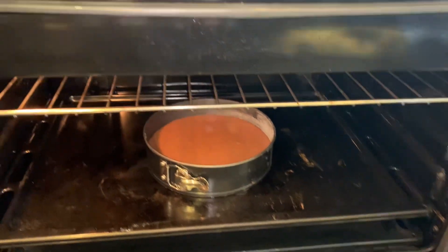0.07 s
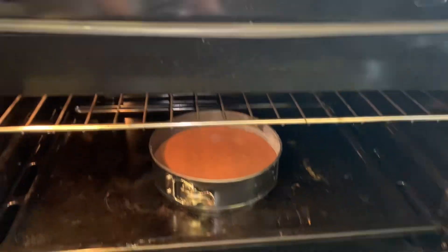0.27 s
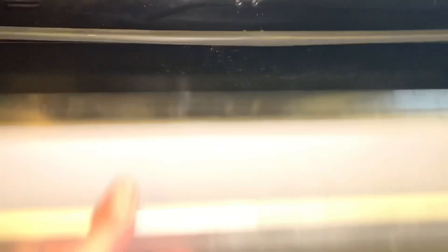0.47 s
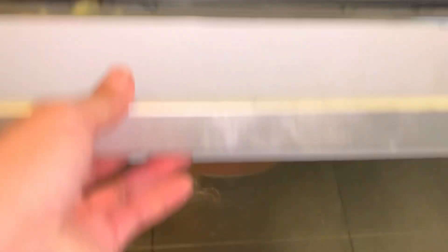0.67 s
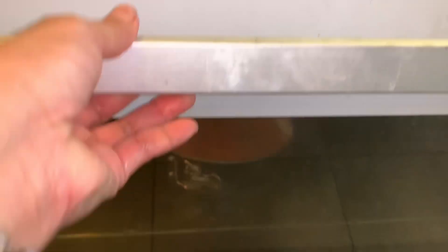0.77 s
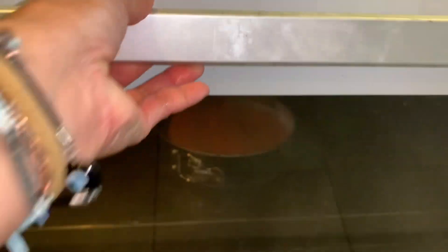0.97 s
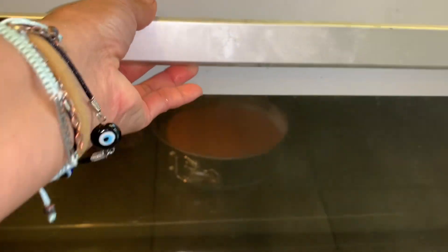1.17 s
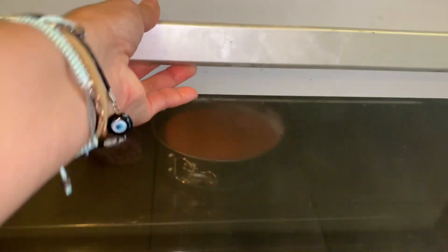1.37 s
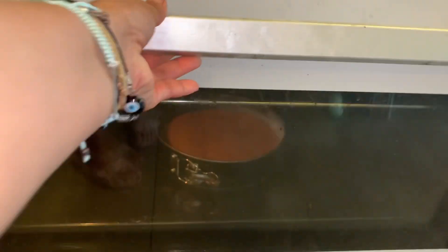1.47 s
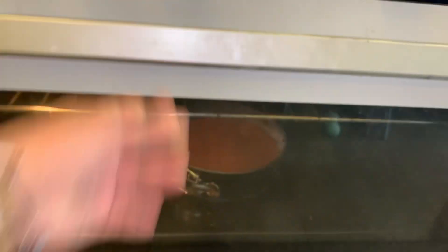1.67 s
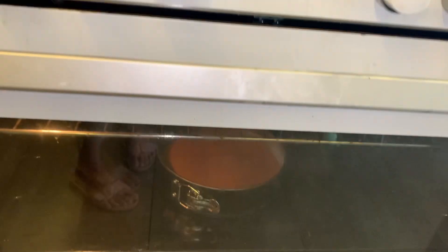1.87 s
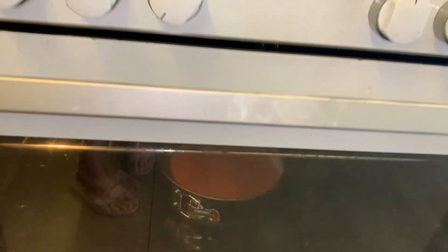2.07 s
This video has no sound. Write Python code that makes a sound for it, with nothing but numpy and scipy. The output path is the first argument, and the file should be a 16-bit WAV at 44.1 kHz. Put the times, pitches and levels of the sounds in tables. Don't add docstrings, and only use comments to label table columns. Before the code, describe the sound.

An oven door swings shut in a tiled kitchen, heard close on a phone in stereo: gritty juddering hinge rub with small squeaks, two bright taps on glass, then a catch snap and heavy thud with rattling racks.

```python
import sys
import numpy as np
from scipy import signal
from scipy.fft import rfft, irfft, next_fast_len
from scipy.io import wavfile
from scipy.ndimage import uniform_filter1d, map_coordinates

SR = 44100
rng = np.random.default_rng(int(sys.argv[2]) if len(sys.argv) > 2 else 0)


def transcribe(signal):
    frames = np.atleast_2d(signal).T
    limited = np.clip(frames, -1, 1)
    pcm = np.round(limited * 32767).astype(np.int16)
    wavfile.write(sys.argv[1], SR, pcm)


def boost_factor(decibels):
    exponent = np.asarray(decibels, float) / 20
    return 10 ** exponent


N = 92830
TIME = np.arange(N) / SR

# start_s, level_db, clatter_db, door_pitch_hz
LANDINGS = [
    (1.557, -9.5, 1, 76.3),
    (1.604, -14.5, -9.5, 97),
    (1.6548, -20.5, -11, 88),
    (1.716, -28, -4, 84),
    (1.755, -30.5, -9, 83),
    (1.805, -28, -3, 64.6),
    (1.904, -33.5, -15, 73.5),
]


def unit(x):
    return x / np.sqrt(np.mean(x ** 2) + 1e-20)


def along(points, hz):
    f, v = np.transpose(points)
    return np.interp(np.log(hz + 1), np.log(f + 1), v)


def curves(rows):
    s, *columns = np.transpose(rows)
    return [np.interp(TIME, s, column) for column in columns]


def wobble(rate):
    return map_coordinates(rng.standard_normal(N // 100), [TIME * rate])


def filtered(x, response):
    m = next_fast_len(N + SR // 2)
    return irfft(rfft(x, m) * response(np.fft.rfftfreq(m, 1 / SR)), m)[..., :N]


def noise(spectrum):
    return unit(filtered(rng.standard_normal((2, N)), lambda hz: boost_factor(along(spectrum, hz))))


def patchy(x):
    patch_db = 3
    z = signal.stft(x, nperseg=1024)[2]
    field = rng.standard_normal(z.shape[1:])
    field = uniform_filter1d(uniform_filter1d(field, size=4, axis=0), size=5, axis=1)
    return signal.istft(z * boost_factor(patch_db * unit(field)), nperseg=1024)[1][:, :N]


def swell(s, db, t60, rise_s):
    t = np.maximum(TIME - s, 0)
    return boost_factor(db - 60 * t / t60) * (1 - np.exp(-t / rise_s))


def ring(s, db, modes, rise_s, scatter):
    draw = rng.standard_normal((len(modes), 4))
    out = np.zeros((2, N))
    first = int(np.ceil(s * SR))
    for (hz, level, t60), u in zip(modes, draw):
        t = TIME[first:first + int(t60 * SR)] - s
        fall = boost_factor(db + level + 1.56 * u[0] - 60 * t / t60) * (1 - np.exp(-t / rise_s))
        phase = 2 * np.pi * hz * (1 + scatter * u[1]) * t
        out[:, first:first + len(t)] += fall * np.sin(phase + [[0], [u[2]]]) * [[1], [np.tanh(u[3])]]
    return out


def thump():
    # pitch_hz, level_db, t60_s
    cabinet_modes = [(56, -14, 0.42), (119.7, -7.5, 0.28), (163, -22, 0.18), (216.3, -17.5, 0.22)]
    # start_s, level_db, pitch_hz, t60_s
    knocks = [(1.578, -17.5, 129, 0.17), (1.615, -22, 134.6, 0.2), (1.645, -25, 122.4, 0.23),
              (1.59, -27, 207, .2), (1.592, -25, 351, 0.11), (1.67, -31, 286, 0.11),
              (1.715, -30, 151, 0.18), (1.74, -31, 143.4, .2), (1.79, -37.5, 307, 0.089),
              (1.822, -39, 216, 0.13)]
    rise_s, grip_s, door_t60_s = 0.005, .014, .5
    ends = [row[0] for row in LANDINGS[1:]] + [N / SR]
    boom = np.zeros(N)
    for (s, db, _, hz), end in zip(LANDINGS, ends):
        held = np.clip((end - TIME) / grip_s, 0, 1)
        boom += swell(s, db, door_t60_s, rise_s) * np.sin(2 * np.pi * hz * (TIME - s)) * held
    body = sum(ring(s, db, cabinet_modes, rise_s, scatter=0.038) for s, db, *_ in LANDINGS)
    panels = sum(ring(s, db, [(hz, 0, t60)], rise_s, scatter=0.0035) for s, db, hz, t60 in knocks)
    return -(body + boom * [[1], [.5]] + panels)


def clatter():
    # pitch_hz, level_db, t60_s
    sheet_modes = [(287.5, -15, 0.3), (392.8, 1, 0.13), (487, -12.5, 0.3), (733.6, 6.5, 0.14),
                   (818, -2.5, 0.11), (1080, -2.5, 0.13), (1267, -4.5, 0.12)]
    # frequency_hz, level_db
    rattle_spectrum = [(88, -40), (150, -11.5), (624, -17.5), (1000, -21), (4000, -34), (7000, -55),
                       (13000, -63), (16000, -59)]
    # start_s, level_db, t60_s
    settles = [
        (1.572, -36.5, 0.22),
        (1.62, -54, 0.11),
        (1.8028, -58, 0.048),
        (1.826, -56, 0.1),
        (1.834, -48, 0.24),
        (1.9504, -51, 0.061),
    ]
    # frequency_hz, level_db
    buzz_spectrum = [(3000, -28), (6500, 8.5), (9000, -5.5), (13000, -9), (16000, -22)]
    sheet_lag_s, sheet_db, rattle_db = .012, -11, -11
    sheet = sum(ring(s + sheet_lag_s, db + c + sheet_db, sheet_modes, 0.013, scatter=0.0066)
                for s, db, c, _ in LANDINGS)
    shake = sum(swell(s, db + c + rattle_db, t60=0.27, rise_s=0.0049) for s, db, c, _ in LANDINGS)
    shake = shake + sum(swell(*row, rise_s=0.00089) for row in settles)
    racks = shake * patchy(noise(rattle_spectrum)) * boost_factor(1.2 * wobble(150))
    buzz = swell(1.64, -52, t60=0.7, rise_s=0.025) * patchy(noise(buzz_spectrum)) * boost_factor(3.1 * wobble(60))
    return sheet + racks + buzz


def catch():
    # start_s, level_db
    contacts = [
        (1.5453, -31),
        (1.5478, -19),
        (1.5497, -14),
    ]
    # pitch_hz, level_db, t60_s
    catch_modes = [(1450, -3, .032), (1620, 0, .013), (1800, -7, .014), (950, -8, .01)]
    left_gain, right_gain, wet_db = 1.15, .85, -9
    snap = sum(ring(s, db, catch_modes, rise_s=0.0003, scatter=0.0026) for s, db in contacts)
    return snap[0] * [[left_gain], [right_gain]] + boost_factor(wet_db) * kitchen(snap)


def hinge_rub():
    # time_s, level_db, brightness_db
    push = [(0, -92.5, 22), (.05, -52, 3), (.11, -39, 3.5), (.17, -36.5, 5.5), (.36, -32.5, 3.5),
            (.48, -31.5, 3), (.55, -34, -14), (.62, -60, -6), (.68, -35, -3), (.77, -39.5, -3.5),
            (.83, -52, -5.5), (.95, -38.5, -4), (1.05, -45, -2.5), (1.2, -44, 0), (1.31, -67.5, -15),
            (1.375, -44.5, -0.5), (1.45, -42.5, -6), (1.545, -40, 3.5)]
    # frequency_hz, level_db
    rub_spectrum = [(30, -11), (80, -15), (380, -6.5), (1270, -13), (3000, -24), (6500, -33), (9200, -34.5),
                    (16000, -44)]
    # center_hz, width_hz, level_db
    door_resonances = [(76, 135, 5), (253, 86, 2.5), (383, 81, 6.5), (716, 140, 1.5), (1100, 210, 1),
                       (2090, 420, -6)]
    # time_s, pitch_hz, level_db
    gap = [(.08, 1650, -9), (.17, 1502, -2), (.25, 1328, -5.5), (.3, 1290, 1.5), (.37, 1280, 1),
           (.41, 1200, -1), (.44, 1026, -2), (.5, 977, -4), (.56, 1100, -12)]
    slips_per_s, slip_spread_db, grit, judder_db = 1500, 4.5, 0.77, 2
    tilt_hz, hiss_db, rub_db = 2140, 4.5, 3
    gap_width_hz, gap_db, gap_ends_s = 210, -2.5, 0.52

    sizes = boost_factor(slip_spread_db * np.clip(rng.standard_normal((2, N)), -2, 2))
    slips = (rng.random((2, N)) < slips_per_s / SR) * sizes * rng.choice([-1, 1], (2, N))
    drive = grit * unit(slips) + rng.standard_normal((2, N))
    drive = drive * boost_factor(judder_db * wobble(38.02))

    def panels(f):
        return 1 + sum(boost_factor(db) * 1j * f * w / (c * c - f * f + 1j * f * w) for c, w, db in door_resonances)

    whole = filtered(patchy(drive), lambda f: boost_factor(along(rub_spectrum, f)) * panels(f))
    high = filtered(whole, lambda f: 1 / (1 + (tilt_hz / (f + 1)) ** 4))
    scale = np.sqrt(np.mean(whole ** 2))

    band = filtered(drive, lambda f: np.exp(-(f / gap_width_hz) ** 2))
    cavity_hz, cavity_db = curves(gap)
    cavity = boost_factor(cavity_db) * unit(band * np.sin(2 * np.pi * np.cumsum(cavity_hz) / SR))
    cavity = cavity / (1 + np.exp((TIME - gap_ends_s) / .03))

    strength_db, bright_db = curves(push)
    rub = (whole - high + boost_factor(hiss_db + bright_db) * high) / scale + boost_factor(gap_db) * cavity
    return (TIME < push[-1][0]) * boost_factor(strength_db + rub_db) * rub


def hinge_jolts():
    # start_s, level_db, panel_pitch_hz
    jolts = [(0.046, -34.5, 370), (0.107, -23, 383), (0.167, -16.5, 344), (0.189, -12, 315),
             (0.228, -21.5, 275), (0.299, -12.5, 387), (0.459, -23, 371), (0.499, -16, 262),
             (0.53, -19.5, 379), (0.666, -29, 295), (0.683, -20.5, 386), (0.701, -23.5, 265),
             (0.72, -22.5, 410), (0.9, -25.5, 383), (0.942, -28, 261), (0.95, -29, 469), (1.0, -28.5, 250),
             (1.025, -26, 401), (1.029, -25.5, 253), (1.16, -29.5, 385), (1.38, -39, 237),
             (1.432, -25.5, 380), (2.035, -34.5, 308)]
    # pitch_hz, level_db, t60_s
    common_modes = [(683.5, -19, 0.084), (1100, -36, 0.038)]
    # start_s, level_db, t60_s
    ticks = [
        (1.352, -52, .1),
        (1.3805, -41, .06),
        (1.428, -43, .1),
        (2.0335, -50, .11),
    ]
    # frequency_hz, level_db
    puff_spectrum = [(100, -35), (300, -6), (1200, -13), (2000, -38), (8000, -48)]
    jolt_db, puff_db, t60_s, rise_s = 1, -12.5, 0.054, 0.0033
    rings = sum(ring(s, db + jolt_db, [(hz, 0, t60_s)] + common_modes, rise_s, scatter=0.0085)
                for s, db, hz in jolts)
    puffs = sum(swell(s, db + puff_db, t60_s, rise_s) for s, db, _ in jolts)
    puffs = puffs + sum(swell(*row, rise_s=0.00046) for row in ticks)
    return rings + puffs * noise(puff_spectrum)


def squeaks():
    # start_s, length_s, pitch_hz, level_db
    chafes = [(.11, .06, 1670, -39), (.18, .04, 830, -39), (.27, .06, 710, -34), (.28, .04, 1200, -36),
              (.33, .05, 1390, -36), (.345, .05, 1190, -36), (.335, .07, 1970, -38), (.41, .045, 2030, -37),
              (.42, .04, 1030, -32), (.44, .07, 770, -37), (.47, .04, 985, -32), (.53, .07, 1120, -42),
              (.67, .07, 1120, -42), (.7, .09, 685, -39), (1.425, .04, 700, -39), (1.355, .05, 3580, -57),
              (1.41, .05, 3560, -58), (1.45, .03, 1950, -52), (1.69, .08, 5000, -61)]
    width_hz = 45
    waver = unit(filtered(rng.standard_normal((2, N)), lambda f: np.exp(-(f / width_hz) ** 2)))
    tones = np.zeros(N)
    for s, length, hz, db in chafes:
        arch = np.sin(np.pi * np.clip((TIME - s) / length, 0, 1))
        tones += boost_factor(db) * arch * np.sin(2 * np.pi * hz * TIME)
    return (0.86 + 0.79 * waver) * tones


def charm():
    # start_s, level_db, t60_s
    taps = [
        (0.8686, -33, 0.057),
        (1.0803, -28.5, 0.06),
        (1.9, -58, 0.029),
        (1.5473, -24.5, 0.073),
        (0.874, -41.5, 0.12),
        (1.0865, -32, 0.059),
        (1.0755, -42, 0.059),
    ]
    # frequency_hz, level_db
    tap_spectrum = [(900, -5.5), (1700, -14.5), (3000, -5.5), (4250, -5), (5300, -9.5), (8800, -10.5),
                    (12000, -19), (16000, -14)]
    # pitch_hz, level_db, t60_s
    charm_modes = [(3350, -1, 0.05), (3750, -4, 0.05), (4120, 0, 0.055), (4480, -2, 0.05),
                   (8800, -2, 0.025)]
    # frequency_hz, level_db
    seal_spectrum = [(5000, -42), (8500, -1), (10500, -6), (14500, -8), (16000, -33)]
    chime_db = -3
    bursts = sum(swell(s, db, t60, rise_s=0.00093) for s, db, t60 in taps)
    bursts = bursts * noise(tap_spectrum) * boost_factor(3.2 * wobble(300))
    chime = sum(ring(s, db + chime_db, charm_modes, 0.00064, scatter=0.0054)
                for s, db, _ in taps[:2] + taps[4:6])
    seal = swell(1.562, -27.5, t60=0.034, rise_s=0.0004) * noise(seal_spectrum)
    return bursts + chime * [[1], [.5]] + seal


def cabinet():
    # time_s, level_db
    sway = [(0, -63), (.12, -57), (.2, -42.5), (.53, -32), (.63, -41), (.75, -34), (.88, -40), (1, -36.5),
            (1.28, -43.5), (1.35, -49.5), (1.41, -45), (2.1, -46)]
    # frequency_hz, level_db
    boom_spectrum = [(13, -67), (22, -24), (50, -7.5), (70, -4.5), (162, -10.5), (200, -11), (260, -4.5),
                     (440, -120)]
    # start_s, level_db, pitch_hz, t60_s
    weight_lurches = [(.2, -36, 52.3, .5), (.27, -30, 55.4, .4), (.43, -32, 90.5, 0.36),
                      (.51, -27.5, 88.3, .4), (.59, -31, 80.15, 0.29), (.72, -27, 84.9, 0.37),
                      (.77, -30, 69.4, 0.44), (.97, -33.5, 88, 0.34), (1.06, -32.5, 85, 0.37),
                      (1.17, -36.5, 85.6, .4), (1.32, -34, 87, 0.39), (1.41, -36.5, 97, 0.48),
                      (2.039, -38, 71, 0.44)]
    rumble_db, lumpy_db, rise_s = -2, 2, 0.013
    rumble = boost_factor(curves(sway)[0] + rumble_db + lumpy_db * wobble(19)) * noise(boom_spectrum)
    lurches = sum(ring(s, db, [(hz, 0, t60)], rise_s, scatter=0.012) for s, db, hz, t60 in weight_lurches)
    return rumble + lurches * [[1], [.5]]


def kitchen(x):
    # frequency_hz, t60_s
    decay = [(100, 0.78), (1000, 0.63), (3000, 0.79), (5000, 0.62), (12000, 0.28)]
    hz, t, z = signal.stft(rng.standard_normal((2, SR)), SR, nperseg=256)
    tail = signal.istft(z * boost_factor(-60 * t / along(decay, hz)[:, None]), SR, nperseg=256)[1]
    delayed = np.pad(x[0], (300, 0))[None]
    return signal.fftconvolve(delayed, tail / np.linalg.norm(tail[0]), axes=1)[:, :N]


def room_floor():
    # frequency_hz, level_db
    floor_spectrum = [(18, -54), (40, 1.5), (360, 0), (1760, -23.5), (3500, -26), (4600, -51),
                      (14000, -41.5)]
    return boost_factor(-51) * noise(floor_spectrum)


def two_ports(pair):
    # frequency_hz, correlation
    alike = [(30, 0.91), (100, 1), (300, 0.83), (700, 0.57), (1500, 0.11), (4000, 0.057), (7000, 0.67),
             (9000, 0.85)]
    # frequency_hz, difference_db
    lean = [(60, -0.5), (240, -2.5), (950, 2), (3770, -1), (15000, -0.5)]
    # frequency_hz, phase_rad
    bass_lead = [(40, .35), (100, .25), (200, 0)]
    lag_s = 1 / 4680

    def mix(hz):
        turn = np.arccos(np.clip(along(alike, hz), -1, 1)) / 2
        return np.array([np.cos(turn), np.sin(turn)])

    def offset(hz):
        phase = np.pi * hz * lag_s + along(bass_lead, hz) / 2
        return boost_factor(np.outer([.5, -.5], along(lean, hz))) * np.exp(np.outer([1j, -1j], phase))

    mid, side = filtered(pair, mix)
    return filtered(np.array([mid + side, mid - side]), offset)


def scene():
    hinge = hinge_rub() + hinge_jolts() + squeaks()
    pair = thump() + cabinet() + room_floor()
    for direct, wet_db in ((hinge, -7.5), (charm(), -8), (clatter(), -10.5)):
        pair = pair + direct + boost_factor(wet_db) * kitchen(direct)
    return catch() + two_ports(pair)


def band_limit(x):
    return signal.sosfilt(signal.butter(12, 16480, fs=SR, output="sos"), x)


def record(dry):
    low_cut_hz, top_hz = 25, 16300
    mix = filtered(dry, lambda hz: (1j * hz / (low_cut_hz + 1j * hz)) ** 2 * (hz < top_hz))
    return band_limit(mix)


dry = scene()
out = record(dry)
transcribe(out)
```